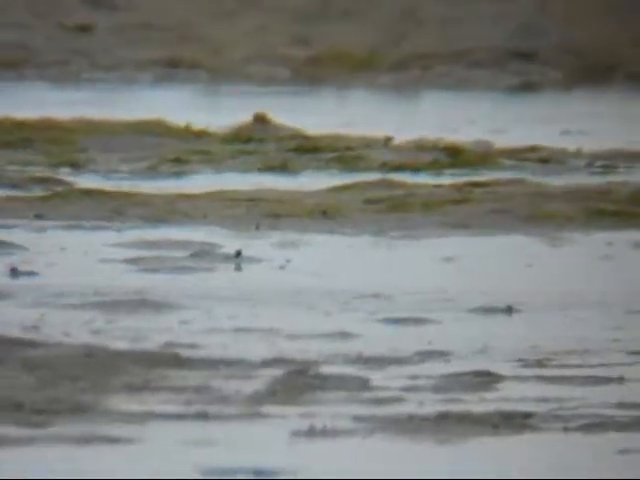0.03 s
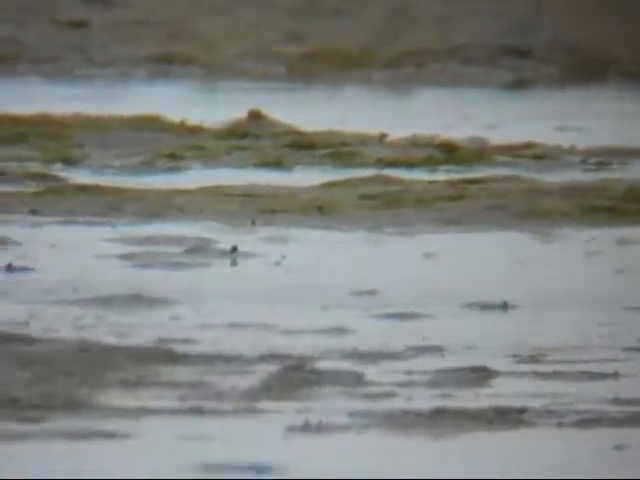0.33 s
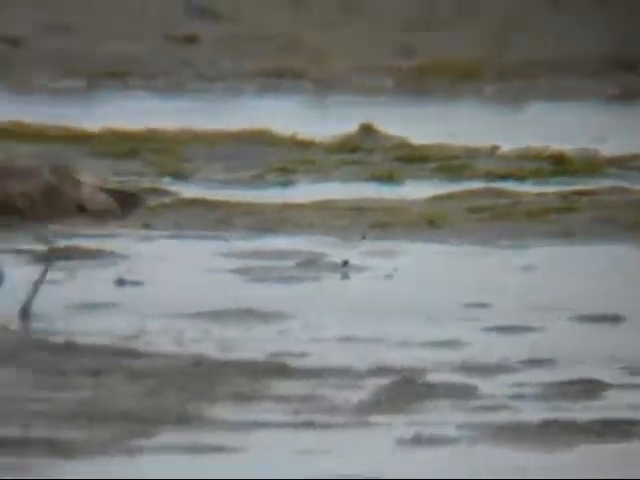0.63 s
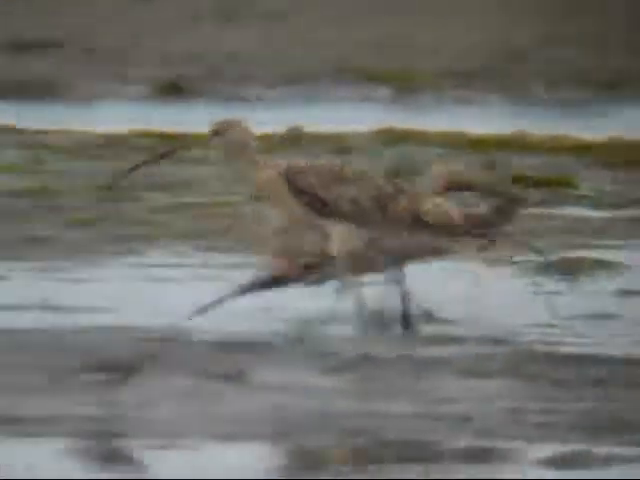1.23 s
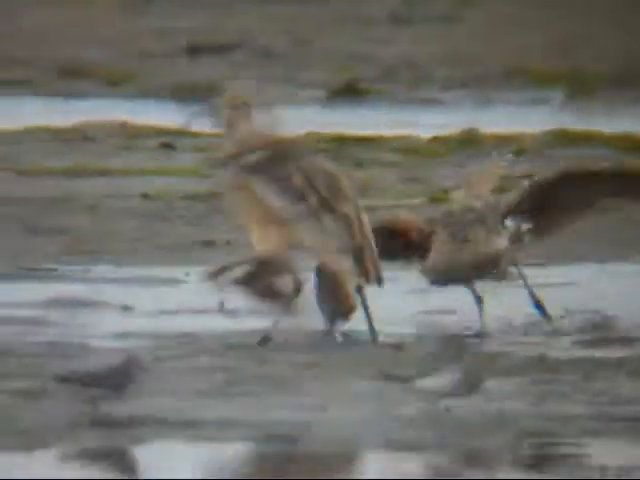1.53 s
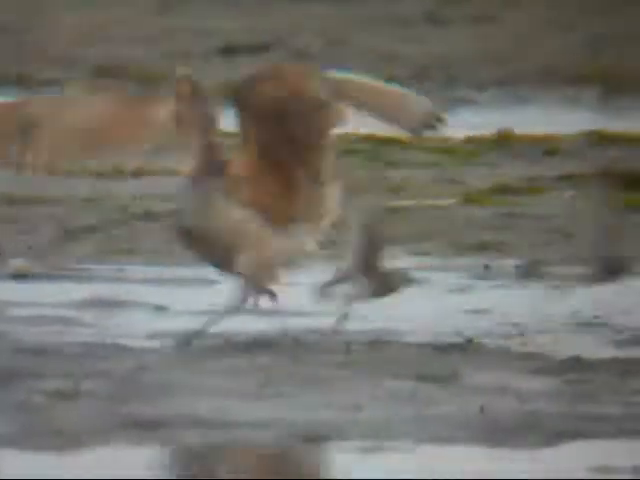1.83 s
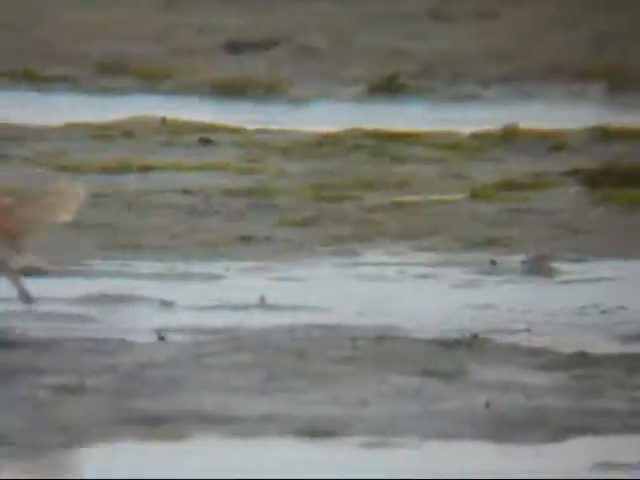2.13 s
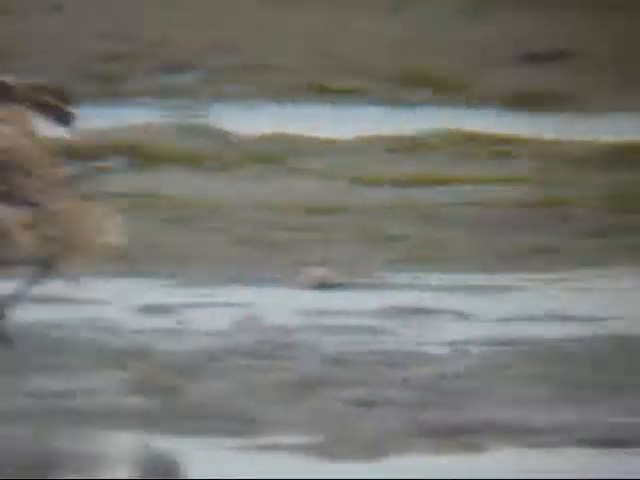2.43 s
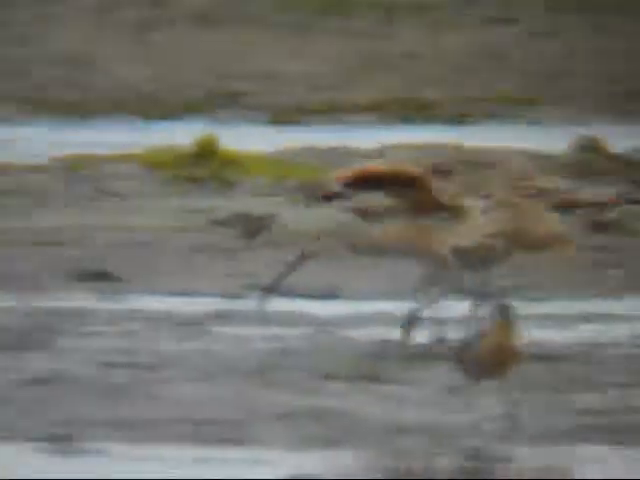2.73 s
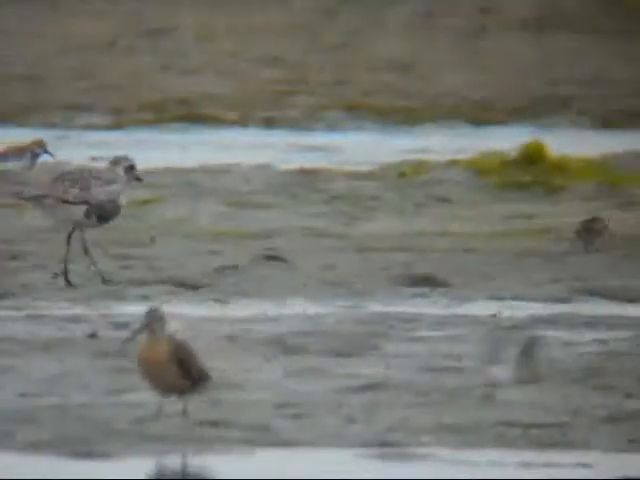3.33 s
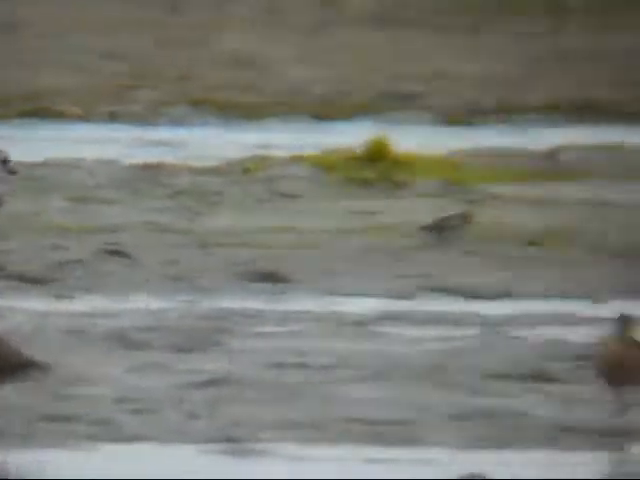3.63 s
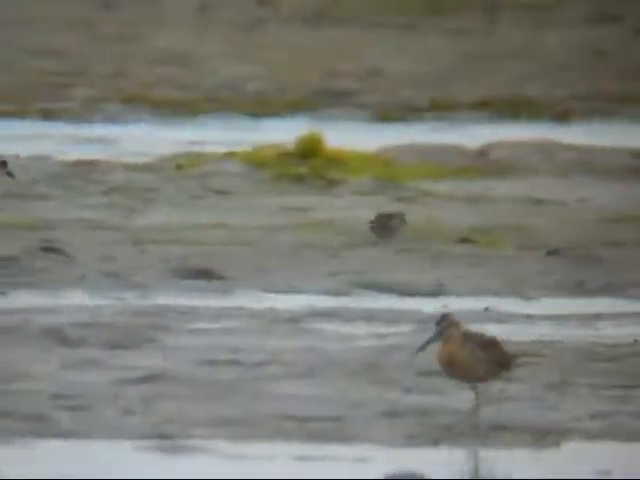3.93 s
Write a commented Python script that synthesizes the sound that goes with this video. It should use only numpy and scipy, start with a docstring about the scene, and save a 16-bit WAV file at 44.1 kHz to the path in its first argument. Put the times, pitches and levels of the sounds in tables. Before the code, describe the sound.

Shorebirds call loudly across open mud: rough two-toned whistles break into pips, followed by a faint splash, a rapid trill and two clearer whistles. A small microphone makes them bright and gritty, picking up a few ticks and soft wind rumble.

```python
"""Shorebirds squabble on an open mudflat, over wind, a distant engine hum and a far flock.
First come harsh two-toned whistles and a hoarse stutter, which break into short pips.
After one more harsh whistle, feet splash, soft low calls join in and a fast trill swells and fades.
Two clean wavering whistles come last. A few sharp ticks sound along the way. Throughout, a small
recorder samples slowly and holds each sample, so every call has bright mirror tones above it."""
import sys
import numpy as np
from scipy import signal
from scipy.fft import rfft, irfft, next_fast_len
from scipy.io import wavfile
from scipy.ndimage import map_coordinates

SR = 44100
rng = np.random.default_rng(int(sys.argv[2]) if len(sys.argv) > 2 else 0)


def log_audio(samples):
    """Write samples as a 16-bit WAV file to the path given in sys.argv[1]."""
    # one column per channel
    frames = np.atleast_2d(samples).T
    # limit to full scale, then quantise
    limited = np.clip(frames, -1, 1)
    pcm = np.round(limited * 32767).astype(np.int16)
    wavfile.write(sys.argv[1], SR, pcm)


N = 176400
T = np.arange(N) / SR  # the time of each sample, in seconds


def amp(db):
    """Turn decibels into a gain. Table levels are relative: each source also has its own gain."""
    return 10 ** (np.asarray(db) / 20)


def unit(x):
    """Scale a signal to an average strength (rms) of 1."""
    return x / np.sqrt(np.mean(x ** 2) + 1e-20)


def curves(rows):
    """Draw straight lines through a table: one curve for each column after the time."""
    times, *columns = np.transpose(rows)
    return [np.interp(T, times, column) for column in columns]


def wobble(rate):
    """A smooth curve through `rate` random values a second."""
    return map_coordinates(rng.standard_normal(int(N * rate / SR) + 4), [T * rate])


def filtered(x, response):
    """Turn each frequency up or down by the gain response(hz)."""
    size = next_fast_len(N + 8192)
    return irfft(rfft(x, size) * response(np.fft.rfftfreq(size, 1 / SR)), size)[:N]


def noise(points):
    """Noise of strength 1, shaped by (frequency_hz, level_db) points."""
    freqs, db = np.transpose(points)
    white = rng.standard_normal(N)
    return unit(filtered(white, lambda hz: amp(np.interp(np.log(hz + 1), np.log(freqs), db))))


def gate(start, length, edge, attack_share=0.72):
    """A note's loudness: quick rise, hold, then a slower fall lasting `edge` seconds."""
    ramp = np.minimum((T - start) / attack_share, start + length - T) / edge
    return np.sin(np.pi / 2 * np.clip(ramp, 0, 1)) ** 2


def glide(rows, ease=0.8):
    """A pitch that moves from row to row, slowing near each by the share `ease`."""
    times, hz = np.transpose(rows)[:2]
    steps = np.arange(len(times))
    place = np.interp(T, times, steps)
    return np.interp(place - ease * np.sin(2 * np.pi * place) / (2 * np.pi), steps, hz)


def phrase(calls, edge):
    """Join calls into one pitch curve and a gain for each tone, silent between calls."""
    joined = [row for rows in calls for row in rows]
    sounding = sum(gate(rows[0][0] - edge / 2, rows[-1][0] - rows[0][0] + edge, edge) for rows in calls)
    return [glide(joined)] + [sounding * amp(db) for db in curves(joined)[1:]]


def phase_of(hz, jitter, rate):
    """The running angle (phase) of a wave with an unsteady pitch."""
    return 2 * np.pi * np.cumsum(hz * (1 + jitter * wobble(rate))) / SR


def tone(phase, rough, rate=900):
    """A sine wave roughened by random flutter."""
    return np.sqrt(2) * ((1 + rough * wobble(rate)) * np.sin(phase)
                         + rough * wobble(rate) * np.cos(phase))


def open_air():
    """The soft, slightly flickering hiss of open air."""
    # hiss colour: frequency_hz, level_db
    spectrum = [(200, -28), (600, -2), (900, -2), (1300, 2), (2000, 4), (3000, 3), (3650, 4), (4000, -5)]
    # hiss loudness: time_s, level_db
    levels = [(0, -32.5), (.7, -32), (1.2, -32), (1.65, -29.5), (1.85, -31.5), (2.2, -31), (2.5, -32),
              (2.85, -32), (3.1, -30.5), (3.3, -32.5), (3.65, -35), (4, -32.5)]
    level_db, = curves(levels)
    return amp(level_db + 0.62 * wobble(25.03)) * noise(spectrum)


def wind_rumble(level_db=-18, gust_below_hz=130):
    """Wind and distant engines rumble; gusts swell the deepest part."""
    # rumble colour: frequency_hz, level_db
    spectrum = [(15, -3.5), (24, -3.5), (35, 1), (50, -3.5), (70, -5.5), (100, -6.5), (160, -15),
                (250, -16), (320, -20), (410, -19.5), (500, -27), (650, -30.5), (1000, -33), (2000, -91)]
    # gust strength: time_s, level_db
    gusts = [(0, -2), (.3, -1.5), (.6, 0), (.9, 1.5), (1.15, -.5), (1.65, 3), (1.9, 1.5), (2.5, -1),
             (3.2, 0), (4, -2)]
    gust_db, = curves(gusts)
    rumble = amp(level_db + 0.44 * wobble(4.89)) * noise(spectrum)
    deep = filtered(rumble, lambda hz: 1 / (1 + (hz / gust_below_hz) ** 4))
    return rumble + (amp(gust_db) - 1) * deep


def engine_hum(pitch_hz=359.6):
    """A distant engine holds its pitch while its loudness drifts."""
    # hum loudness: time_s, level_db
    levels = [(0.0, -30.5), (0.24, -35.5), (0.51, -28.5), (1.87, -31.5), (1.99, -25.5), (3.55, -44.5),
              (3.81, -34), (4.0, -51)]
    # tones in the hum: pitch_multiple, level_db
    tones = [(1, -0.5), (1.12, -11), (2, -21), (3, -25.5)]
    level_db, = curves(levels)
    phase = phase_of(pitch_hz, jitter=0.003084, rate=6)
    return amp(level_db) * sum(amp(db) * tone(k * phase, rough=0.13, rate=14) for k, db in tones)


def slides(rows):
    """Short wavering notes that slide from one pitch to another."""
    out, waver = np.zeros(N), 1 + .006 * wobble(120)
    for start, length, first_hz, last_hz, db in rows:
        span = slice(max(int(start * SR), 0), int((start + length) * SR))
        progress = (T[span] - start) / length
        hz = (first_hz + (last_hz - first_hz) * progress) * waver[span]
        swell = np.sqrt(2 * np.abs(np.sin(np.pi * progress)))
        out[span] += amp(db) * swell * np.sin(2 * np.pi * np.cumsum(hz) / SR)
    return out * (1 + 0.53 * wobble(300))


def far_birds(count=90, flock_hz=3420, spread_hz=702):
    """A few distant calls over the many quick, soft peeps of the flock."""
    # faint calls: start_s, length_s, first_pitch_hz, last_pitch_hz, level_db
    calls = [(0.012, .05, 3150, 3460, -40), (0.207, 0.061, 3160, 3470, -35), (.208, 0.032, 1340, 1470, -34),
             (0.538, .025, 3920, 3530, -35), (0.849, 0.022, 1725, 1660, -31),
             (1.313, 0.032, 1730, 1920, -32.5), (1.468, .02, 1520, 1600, -31),
             (1.776, .02, 1570, 1660, -36), (2.577, 0.031, 2735, 2450, -32), (2.99, 0.14, 2280, 2360, -40),
             (3.176, 0.029, 2465, 2440, -33), (3.566, 0.14, 3660, 3755, -37.5),
             (3.18, 0.044, 3560, 3320, -44), (3.724, 0.033, 3150, 2930, -41),
             (3.949, 0.044, 3650, 3570, -35)]
    peeps = [(4 * when, 0.02183 + 0.0292 * length, flock_hz + spread_hz * (first - .5),
              flock_hz + spread_hz * (2 * last - 1), -41.5 - 6 * softness)
             for when, length, first, last, softness in rng.random((count, 5))]
    return slides(calls) + slides(peeps)


def ticks(high_hz=2900, low_hz=1350, length_s=.0016):
    """Tiny hard contacts at the recorder, each a few waves long."""
    # sharp ticks: start_s, level_db
    contacts = [(.376, -13), (.61, -27), (1.6872, -2), (1.6933, -13), (2.673, -18), (2.9747, -16.5)]
    out = np.zeros(N)
    for start, db in contacts:
        angle = 2 * np.pi * (T - start)
        ring = np.sin(high_hz * angle) + 0.43 * np.sin(low_hz * angle)
        out += amp(db - 3.5) * gate(start, length_s, edge=length_s / 3) * ring
    return out


def splashes(count=14, start_s=1.57, length_s=.13):
    """Feet spatter in the shallows as the birds chase each other."""
    spatters = sum(amp(-9 * softness) * gate(start_s + length_s * when, 0.0048, edge=0.0034)
                   for when, softness in rng.random((count, 2)))
    return amp(-28) * spatters * noise([(500, -17), (1500, 5), (2500, 0), (3700, -1), (4500, -20)])


def low_calls():
    """Soft wavering whistles with rough tones at 1.5 and 2 times their pitch."""
    # one list for each call: time_s, pitch_hz, level_db
    calls = [
        [(1.52, 2013, -41), (1.538, 1958, -43), (1.548, 1650, -38), (1.558, 1640, -35), (1.716, 1574, -35),
         (1.732, 1666, -32), (1.77, 1630, -52)],
        [(2.42, 1540, -56), (2.432, 1648, -43), (2.442, 1880, -34.5), (2.45, 1908, -50), (2.455, 1853, -58)],
        [(2.485, 1646, -49), (2.495, 1672, -49), (2.507, 1900, -36), (2.515, 1940, -35.5), (2.523, 1574, -43),
         (2.53, 1623, -55)],
        [(2.575, 1840, -38), (2.591, 1910, -35.5), (2.609, 1714, -41), (2.619, 1678, -37), (2.633, 1822, -39),
         (2.645, 1793, -41), (2.66, 1900, -38)],
        [(3.175, 1534, -33.5), (3.185, 1534, -38), (3.191, 1735, -34), (3.197, 1745, -39), (3.221, 1600, -43),
         (3.239, 1866, -33), (3.255, 1765, -40)],
        [(3.47, 1936, -46), (3.478, 1970, -39), (3.494, 1850, -47), (3.51, 1867, -35), (3.53, 1710, -42),
         (3.536, 1576, -51), (3.54, 1550, -59)],
    ]
    hz, gain = phrase(calls, edge=.008)
    phase = phase_of(hz * (1 + 0.01115 * wobble(55)), jitter=0.00766, rate=190)
    voice = tone(phase, rough=0.11)
    voice += amp(-6) * tone(1.5 * phase, rough=0.8) + amp(-5.5) * tone(2 * phase, rough=0.74)
    return amp(3 + 2.5 * wobble(80)) * gain * voice


def rasp():
    """The scratchy hiss that goes with a call."""
    scratch = amp(3 * wobble(350))
    hiss = noise([(300, -23), (900, -3), (1700, -5), (2400, -3), (3700, 1.5), (4500, 2.5)])
    return unit(scratch * hiss)


def clean_whistles():
    """Two nearly pure wavering whistles; a fast flutter adds faint side tones."""
    # the two whistles: time_s, pitch_hz, level_db
    short_call = [(2.672, 2407, -23), (2.68, 2403, -20), (2.692, 2289, -22.5), (2.716, 2350, -20.5),
                  (2.752, 2272, -24), (2.772, 2354, -33), (2.78, 2272, -23)]
    long_call = [(3.238, 2532, -26), (3.248, 2483, -20), (3.262, 2347, -20), (3.272, 2342, -22),
                 (3.292, 2571, -17.5), (3.304, 2586, -22), (3.314, 2412, -19), (3.322, 2400, -20),
                 (3.342, 2589, -19.5), (3.362, 2471, -23.5), (3.386, 2589, -19), (3.402, 2531, -27),
                 (3.43, 2589, -20.5), (3.448, 2483, -24), (3.49, 2437, -26), (3.504, 2550, -32.5),
                 (3.526, 2410, -29), (3.55, 2320, -38)]
    hz, gain = phrase([short_call, long_call], edge=.003)
    flutter = 1 + amp(-28) * np.sin(phase_of(hz / 11, jitter=.1, rate=140))
    voice = tone(phase_of(hz, jitter=0.0067, rate=300), rough=0.05)
    return amp(2) * gain * (flutter * voice + amp(-13) * rasp())


def trill(bend_hz_per_s2=820000, peak_early_s=0.00292):
    """Quick hoarse notes that shorten along the run, each rising and falling in pitch."""
    # trill notes: middle_s, length_s, top_pitch_hz, level_db
    notes = [(1.744, .032, 2370, -32.5), (1.802, .028, 2360, -27.5), (1.853, .028, 2360, -27.5),
             (1.951, 0.033, 2440, -24.5), (1.999, 0.021, 2435, -25.5), (2.042, 0.029, 2400, -26.5),
             (2.089, 0.02, 2430, -23), (2.135, 0.023, 2425, -24.5), (2.187, 0.01645, 2400, -25.5),
             (2.233, 0.014, 2485, -26.5), (2.28, 0.016, 2420, -29.5), (2.331, 0.014, 2450, -28.5),
             (2.386, 0.011, 2453, -28)]
    hz, gain, hoarse = np.full(N, 2000.), np.zeros(N), np.zeros(N)
    for middle, length, top_hz, db in notes:
        note = gate(middle - length / 2, length, edge=0.0073)
        hz = np.where(note > 0, top_hz - bend_hz_per_s2 * (T - middle + peak_early_s) ** 2, hz)
        gain += amp(db) * note * amp(-.01 * (top_hz - hz))  # softer away from the top pitch
        hoarse += note
    hiss = noise([(500, -24), (1500, -6), (2700, -6), (3600, 0), (4500, -1)])
    phase = phase_of(hz, jitter=0.0081, rate=400)
    sides = amp(-17.5) * tone(0.75 * phase, rough=.6) + amp(-16.5) * tone(1.2 * phase, rough=0.53)
    return amp(1) * gain * (tone(phase, rough=0.17) + sides) + amp(-31) * hoarse * hiss


def two_toned(hz, main, upper, rough, flutter_db, sides_db, rasp_db):
    """A bird's voice box sounds two tones at once; their beating adds weak tones on either side."""
    # upper pitch divided by main pitch: time_s, ratio
    ratios = [(.36, 1.25), (.41, 1.22), (.45, 1.25), (.79, 1.267), (.88, 1.3), (.97, 1.27), (1.25, 1.23),
              (1.33, 1.2), (1.5, 1.26)]
    ratio, = curves(ratios)
    low = phase_of(hz, jitter=.006, rate=300)
    high = phase_of(hz * ratio, jitter=0.0053, rate=460)
    sides = amp(sides_db) * np.sqrt(main * upper) * (np.sin(2 * low - high) + np.sin(2 * high - low))
    flutter = 1 + amp(flutter_db) * np.sin(phase_of(hz / 6, jitter=0.133, rate=180))
    main_voice = flutter * tone(low, rough) + amp(rasp_db) * rasp()
    upper_voice = tone(high, rough) + amp(rasp_db) * rasp()
    return main * main_voice + upper * upper_voice + sides


def stutter(rise_hz_per_s=3000):
    """Three hoarse notes early in the quarrel, each rising a little."""
    # stutter notes: start_s, length_s, pitch_hz, level_db
    notes = [(0.247, 0.016, 1830, -27), (.265, .024, 1944, -20), (.289, .024, 2026, -20)]
    hz, gain = np.full(N, 2000.), np.zeros(N)
    for start, length, pitch, db in notes:
        note = gate(start, length, edge=0.0036)
        hz = np.where(note > 0, pitch + rise_hz_per_s * (T - start - length / 2), hz)
        gain += amp(db) * note
    return two_toned(hz, gain, amp(-19) * gain, rough=0.23, flutter_db=-3.5, sides_db=-21, rasp_db=0)


def pips(bend_hz_per_s2=800000):
    """Short two-toned notes whose pitch rises and falls in an arch."""
    # pips: start_s, length_s, top_time_s, top_pitch_hz, main_level_db, upper_level_db
    notes = [(0.859, 0.015, .862, 2440, -27, -34), (0.869, 0.027, .882, 2306, -26, -25),
             (.944, 0.032, .969, 2332, -16.5, -31.5), (1.032, 0.02, 1.047, 2260, -31, -23),
             (1.108, 0.015, 1.116, 2305, -23.5, -24), (1.173, 0.019, 1.187, 2377, -22, -36),
             (1.238, 0.0268, 1.259, 2308, -21, -28.5), (1.316, .020, 1.331, 2280, -32, -25.5),
             (1.399, 0.031, 1.405, 2240, -26.5, -35)]
    hz, main, upper = np.full(N, 2000.), np.zeros(N), np.zeros(N)
    for start, length, top_s, top_hz, main_db, upper_db in notes:
        note = gate(start, length, edge=0.0071)
        hz = np.where(note > 0, top_hz - bend_hz_per_s2 * (T - top_s) ** 2, hz)
        note *= amp(-.02 * (top_hz - hz))  # softer away from the top pitch
        main += amp(main_db) * note
        upper += amp(upper_db) * note
    return amp(2) * two_toned(hz, main, upper, rough=0.11, flutter_db=-16, sides_db=-16, rasp_db=-11)


def harsh_whistles():
    """Loud warbling calls that keep breaking into two tones."""
    # one list for each call: time_s, pitch_hz, main_level_db, upper_level_db
    calls = [
        [(0.0, 2165, -17, -42), (0.018, 2182, -21, -36), (0.028, 2260, -34, -42), (0.04, 2090, -36, -51),
         (0.05, 2156, -45, -58)],
        [(0.318, 1999, -16, -24), (0.326, 1979, -16.5, -44), (0.342, 1995, -17.5, -23),
         (0.356, 2139, -13.5, -38), (0.364, 2174, -9.5, -36), (0.378, 2022, -15, -30), (0.391, 2008, -21, -22)],
        [(0.396, 2194, -30, -12.5), (0.41, 2285, -19.5, -29), (0.422, 1996, -20, -16.5), (0.43, 1890, -24, -30),
         (0.438, 1974, -15.5, -33), (0.452, 2306, -13.5, -17.5), (0.463, 2280, -25, -26.5)],
        [(0.557, 2077, -24, -38), (0.569, 2187, -20, -23), (0.581, 2098, -21.5, -32), (0.597, 2090, -19.5, -33),
         (0.611, 2248, -16, -26), (0.621, 2277, -15.5, -49), (0.635, 2142, -20.5, -34), (0.643, 2145, -18, -43),
         (0.655, 2296, -14, -21.5), (0.665, 2310, -34, -27)],
        [(0.742, 2097, -23, -23), (0.752, 2199, -32, -21.5), (0.766, 2186, -25, -25), (0.79, 2297, -23.5, -16),
         (0.8, 2310, -35, -37)],
        [(1.49, 2374, -19, -36), (1.494, 2225, -28, -19.5), (1.51, 2121, -39, -23.5), (1.52, 2027, -23, -22),
         (1.53, 2026, -22.5, -38), (1.548, 2084, -22, -41), (1.562, 2160, -32, -46)],
    ]
    hz, main, upper = phrase(calls, edge=0.0013)
    return amp(1) * two_toned(hz, main, amp(-0.5) * upper,
                              rough=0.086, flutter_db=-16.5, sides_db=-20, rasp_db=-11)


def echo(x, level_db=-23, fade_s=0.2):
    """Open ground scatters back a faint, short echo."""
    t = T[:SR // 2]
    tail = rng.standard_normal(len(t)) * amp(-60 * t / fade_s)
    return amp(level_db) * signal.fftconvolve(x, tail / np.linalg.norm(tail))[:N]


def scene():
    """The birds, their echo and the ticks over the background, in one channel."""
    birds = harsh_whistles() + stutter() + pips() + trill() + clean_whistles()
    birds += low_calls() + far_birds() + splashes()
    return (birds + echo(birds) + ticks() + engine_hum() + wind_rumble() + open_air())[None]


def record(dry, hold_hz=8012, input_top_hz=3960, output_top_hz=15500):
    """The recorder samples slowly and holds each sample; the steps mirror the sound into the treble."""
    rounded = dry[0] / (1 + np.abs(dry[0] / .75) ** 8) ** (1 / 8)  # soften the loudest peaks
    narrow = filtered(rounded, lambda hz: (hz > 12) / np.sqrt(1 + (hz / input_top_hz) ** 70))
    held = np.abs(T * hold_hz + .035 * wobble(1200)).astype(int)  # each hold is slightly uneven
    samples = map_coordinates(narrow, [np.arange(held.max() + 1) * SR / hold_hz])
    return filtered(samples[held], lambda hz: hz < output_top_hz)[None]


dry = scene()
out = record(dry)
log_audio(out)
```